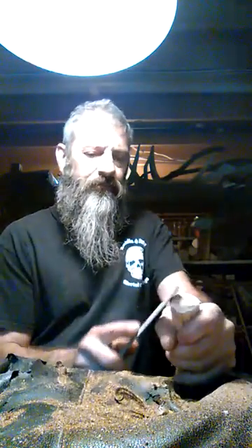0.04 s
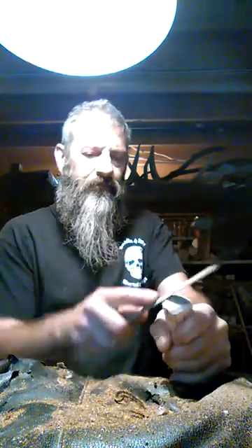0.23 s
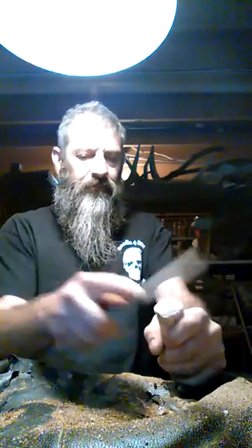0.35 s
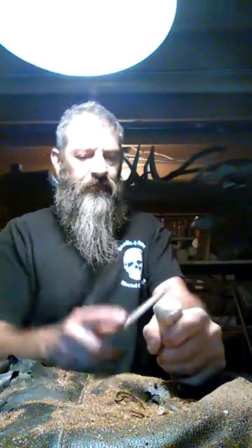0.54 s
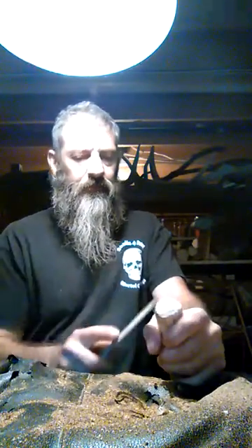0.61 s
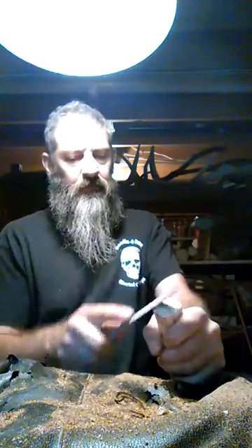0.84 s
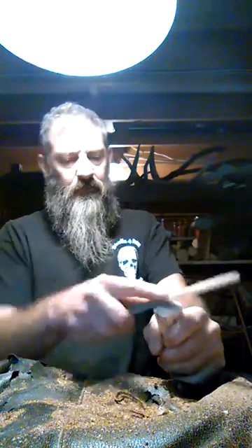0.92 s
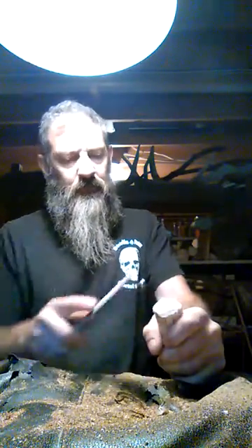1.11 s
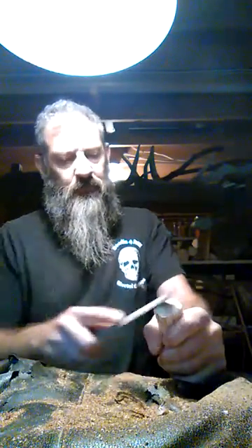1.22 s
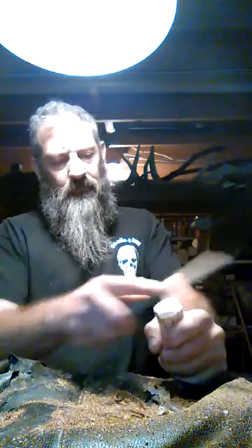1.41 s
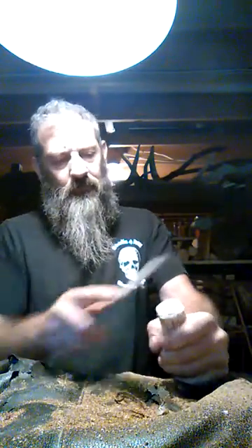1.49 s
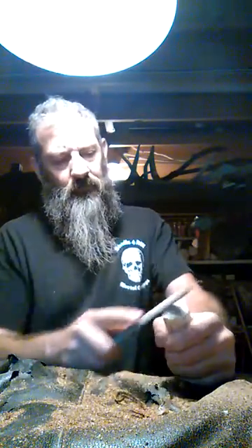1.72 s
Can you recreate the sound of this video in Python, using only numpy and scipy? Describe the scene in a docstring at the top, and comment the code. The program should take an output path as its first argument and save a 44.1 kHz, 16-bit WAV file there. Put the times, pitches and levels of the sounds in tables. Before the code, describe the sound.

Filing on wood in a small workshop: three scratchy strokes, each rising and falling in pitch. A booming bench bump and softer knocks follow the first, and the file taps down before the third. Two microphones catch faint room hiss.

```python
"""In a small workshop, a hand file makes three strokes across the end of a wooden stick, held in a fist
on a cloth-covered bench. The file lands with a knock; its teeth catch at a rate that follows its speed,
driving the stick's resonances and tearing off fibres. After the first stroke the hand bumps down hard
and the bench booms in its modes. Between strokes there is light brushing, and the moving arms make the
bench rumble. Two microphones hear it all with the room's reflections and steady noise."""
import sys
import numpy as np
from scipy import signal
from scipy.fft import rfft, irfft
from scipy.io import wavfile

SR = 44100
rng = np.random.default_rng(int(sys.argv[2]) if len(sys.argv) > 2 else 0)


def dump_mix(stems):
    """Bounce the given channels to the path in sys.argv[1] as a 16-bit WAV at rate SR."""
    frames = np.atleast_2d(stems).T  # one column per channel
    limited = np.clip(frames, -1, 1)  # hard clip at full scale
    pcm = np.round(limited * 32767).astype(np.int16)
    wavfile.write(sys.argv[1], SR, pcm)


N = 77175
TIME = np.arange(N) / SR


def filing():
    """Periodic forcing: each tooth kicks the stick and tears fibres, so pitch follows the file's speed."""
    # One table a stroke. Each row: time in seconds, teeth per second, relative chatter level in dB.
    strokes = [
        [(.14, 170, -46.5), (.196, 280, -34.5), (.208, 332, -35), (.226, 505, -16.5), (.243, 510, -26.5),
         (.268, 370, -29.5), (.305, 215, -39), (.335, 235, -30.5), (.36, 335, -22.5), (.382, 365, -28),
         (.401, 520, -13), (.413, 565, -25.5), (.432, 490, -41)],
        [(.835, 210, -49), (.895, 230, -41.5), (.925, 245, -35), (.942, 500, -30.5), (.98, 550, -49),
         (1.005, 679, -21.5), (1.04, 575, -37), (1.065, 448, -39), (1.095, 230, -62)],
        [(1.355, 260, -38), (1.395, 460, -43), (1.421, 610, -28), (1.429, 720, -25), (1.451, 760, -42),
         (1.47, 732, -35.5), (1.478, 590, -33.5), (1.497, 480, -36.5), (1.513, 240, -41), (1.53, 220, -43),
         (1.56, 190, -68.5)],
    ]
    # Pressure on the file, one table a stroke. Each row: time in seconds, relative rasp level in dB.
    pressures = [
        [(.125, -60), (.16, -42), (.215, -33), (.255, -31.5), (.305, -34), (.37, -34.5), (.414, -29.5),
         (.435, -41.5), (.485, -41.5), (.52, -51)],
        [(.83, -57), (.88, -40.5), (.915, -38.5), (.95, -29), (.985, -31), (1.048, -33), (1.08, -40),
         (1.12, -59)],
        [(1.347, -36.5), (1.385, -34.5), (1.41, -30.5), (1.46, -32.5), (1.492, -29.5), (1.52, -42),
         (1.56, -50.5)],
    ]
    # One row a stroke. Each row: contact cut-off in Hz, unevenness of the speed as a fraction.
    bites = [(450, .028), (1300, .022), (2600, .01)]
    # The sharp edge of a tooth's catch. Each row: frequency in Hz, relative spectral level in dB.
    edge_spectrum = [(500, -25), (1000, -5), (2100, 0), (3400, -1), (5000, -10), (9000, -25)]
    chatter_gain_db, shimmer_db, tooth_gating = -2.5, 3, 0.18
    squeak_hz, squeak_width_hz, squeak_db = 1490, 85, 3
    edge_reference_hz, edge_db = 662, -6
    kicks, bursts, squeak, edges = np.zeros((4, N))
    for stroke, pressure, (cut_hz, jitter) in zip(strokes, pressures, bites):
        rate, chatter_db = in_time(stroke)
        teeth = np.cumsum(rate * (1 + jitter * drift(80))) / SR
        catches = np.diff(np.floor(teeth), prepend=0) * SR / rate  # one impulse a tooth
        chatter = during(stroke) * from_db(chatter_gain_db + chatter_db + shimmer_db * drift(200))
        kicks += soften(catches, cut_hz) * chatter
        push = during(pressure) * from_db(in_time(pressure)[0])
        edges += push * rate / edge_reference_hz * coloured(catches * np.sqrt(rate), edge_spectrum)
        bursts += push * (1 + tooth_gating * np.cos(2 * np.pi * teeth))
        # The stick squeaks when twice the tooth rate meets a resonance.
        resonance = np.exp(-((2 * rate - squeak_hz) / squeak_width_hz) ** 2)
        squeak += push * resonance * np.sin(2 * np.pi * 2 * teeth)
    return stick(kicks) + bursts * rasp() + from_db(squeak_db) * squeak + from_db(edge_db) * edges


def stick(force):
    """Resonance: stick and file respond as parallel band-pass filters of alternating sign."""
    # Each row: frequency in Hz, bandwidth in Hz, peak gain in dB.
    resonances = [(209.7, 23.2, 10.5), (334.5, 40, 2), (530, 130, 1.5), (610.3, 71, -1), (670, 110, -11),
                  (1060, 490, -19), (1414, 66, -2.5), (2006, 27, -11.5), (2154, 440, -21.5),
                  (2840, 24, -20.5), (3014, 180, -8.5), (3434, 140, -2.5), (3747, 51, -17),
                  (5215, 450, -7.5)]
    out = 0
    for k, (hz, width_hz, db) in enumerate(resonances):
        r = np.exp(-np.pi * width_hz / SR)
        poles = [1, -2 * r * np.cos(2 * np.pi * hz / SR), r * r]
        out += (-1) ** k * from_db(db) * (1 - r * r) / 2 * signal.lfilter([1, 0, -1], poles, force)
    return out


def rasp():
    """Broadband excitation: tearing fibres are heard directly and also ring the stick."""
    # Each row: frequency in Hz, relative spectral level in dB.
    spectrum = [(100, -9), (250, -6.5), (650, 10), (1100, 0), (1700, -4.5), (2100, 6.5), (2400, 0.5),
                (2700, 5), (3500, 0), (4150, 4), (5200, 5.5), (6500, 3.5), (8500, 2.5), (11000, -0.5),
                (14000, -4)]
    tearing = from_db(-1) * coloured(spread(fibres), spectrum)
    ringing = from_db(-8.5) * rms_one(stick(fibres()))
    return tearing + ringing


def fibres(per_second=16000, spread_db=3):
    """Shot noise: fibres snap at random instants and with uneven size."""
    sizes = from_db(spread_db * np.minimum(rng.exponential(1, N), 4)) * rng.choice([-1, 1], N)
    return sizes * (rng.random(N) < per_second / SR)


def file_landings():
    """Impact excitation: the file lands and the held stick rings in damped modes."""
    # Each row: start in seconds, force level in dB, contact cut-off in Hz, crack level in dB.
    hits = [(.0103, -23, 2000, -34), (.0142, -22, 2500, -36), (.8312, -26, 650, -43),
            (1.3475, -13, 1000, -28), (1.3562, -23, 1500, -38)]
    # Each row: frequency in Hz, gain in dB, time to decay by 60 dB in seconds.
    modes = [(160, -9.5, 0.11), (217.4, -1, 0.083), (520, -6, 0.034), (608.6, -9, 0.16), (855, -19, 0.18),
             (1123, -19, 0.054), (1409, -8.5, .045), (1447, -14, 0.063), (2000, -14.5, 0.04),
             (3400, -20, .035)]
    return knocks(hits, modes)


def bench_bumps():
    """Free vibration: bumped by hand and stick, the bench booms in its low modes."""
    # Each row: start in seconds, force level in dB, contact cut-off in Hz, crack level in dB.
    hits = [(.228, -14, 77, -68), (.253, -10, 92, -74), (.272, -26, 106, -89), (.469, -4.5, 1110, -27.5),
            (.4745, -16, 1190, -18), (.487, -12.5, 456, -50), (.506, -11.5, 137, -74),
            (.572, -18, 250, -63), (.583, -14, 176, -66), (.6135, -24, 220, -43.5),
            (.7325, -22, 240.7, -44.5), (1.598, -27.5, 130, -54.5), (1.657, -35.5, 255, -63)]
    # Each row: frequency in Hz, gain in dB, time to decay by 60 dB in seconds.
    modes = [(59.1, -14.5, .55), (101.5, -23, 0.13), (130.2, -12, 0.1), (168, -8.5, 0.074),
             (230.6, -2, 0.077), (296, -2.5, .06), (401, -7, 0.068), (555, -4.5, 0.028), (689, -8.5, 0.033),
             (849, -9.5, 0.1), (940, -22, 0.12), (1090, -27, .06)]
    return knocks(hits, modes)


def knocks(hits, modes, crack_s=0.012):
    """Modal superposition: each contact starts a sum of decaying sines and a short crack of noise."""
    # Each row: frequency in Hz, relative spectral level in dB.
    crack_spectrum = [(200, 14.5), (700, 12.5), (1500, -9), (2800, -9), (7000, -11.5), (14000, -19.5)]
    force, crack, ring = np.zeros((3, N))
    for s, db, cut_hz, crack_db in hits:
        force += from_db(db) * soften(signal.unit_impulse(N, int(s * SR)), cut_hz, order=2)
        crack += from_db(crack_db) * (TIME >= s) * np.exp(-np.abs(TIME - s) / crack_s)
    for hz, db, t60 in modes:
        r, w = from_db(-60 / (t60 * SR)), 2 * np.pi * hz / SR
        ring -= from_db(db) * signal.lfilter([0, np.sin(w)], [1, -2 * r * np.cos(w), r * r], force)
    return ring + crack * coloured(spread(white), crack_spectrum)


def brushing(attack_s=0.024, release_s=0.12, flicker_db=2.5):
    """Sliding friction: the file rubs with a light, bright noise as it is drawn back."""
    # Each row: start in seconds, length in seconds, level before the fades in dB.
    rubs = [(0.509, .07, -46.5), (0.606, 0.015, -37.5), (1.178, 0.069, -56.5), (1.539, 0.22, -49),
            (1.663, 0.095, -53.5)]
    # Each row: frequency in Hz, relative spectral level in dB.
    spectrum = [(500, 8), (1200, -15.5), (3500, -1), (6000, -2), (8500, 2), (11000, -2.5), (14000, -9)]
    level = 0
    for s, length, db in rubs:
        rise = np.clip((TIME - s) / attack_s, 0, 1)
        fall = np.clip((s + length - TIME) / release_s + .5, 0, 1)
        level += from_db(db) * rise * fall
    return level * coloured(spread(white) * from_db(flicker_db * drift(250)), spectrum)


def handling():
    """Structure-borne sound: the moving arms shake the bench into a low rumble."""
    # Each row: time in seconds, level in dB.
    levels = [(0, -49), (.11, -47.5), (.2, -34), (.26, -27), (.31, -41.5), (.44, -34), (.64, -35.5),
              (.8, -45), (.95, -36), (1.04, -44.5), (1.11, -37.5), (1.2, -61), (1.32, -59), (1.4, -42),
              (1.66, -44.5), (1.75, -48.5)]
    # Each row: frequency in Hz, relative spectral level in dB.
    spectrum = [(25, -18), (55, 16.5), (78, -7), (110, 6), (160, 2), (230, 1), (330, -7), (550, -27.5),
                (1000, -43.5), (4000, -53)]
    return from_db(in_time(levels)[0]) * coloured(white(), spectrum)


def room_noise():
    """Stationary noise: the room has a faint, steady rumble and hiss."""
    # Each row: frequency in Hz, relative spectral level in dB.
    spectrum = [(25, 32), (60, 1), (200, -4), (500, -39), (1200, -11), (4000, -13), (9000, -3.5),
                (14000, -16)]
    return from_db(-54) * coloured(spread(white), spectrum)


def workshop(x, early_s=0.011, t60_s=0.32):
    """Reverberation: nearby reflections and a short tail, different on each side, join the direct sound."""
    # Each row of both: frequency in Hz, level relative to the direct sound in dB.
    early = [(60, -11.5), (250, -31.5), (600, -22), (1500, 4.5), (4000, -12.5), (9000, -1)]
    tail = [(60, -30), (250, -17), (800, -15.5), (1500, -11), (2500, -6.5), (9000, -6.5)]
    response = 1
    for share, decay in ((early, np.exp(-TIME / early_s)), (tail, from_db(-60 * TIME / t60_s))):
        reflections = rms_one(rng.standard_normal((2, N)) * decay) / np.sqrt(N)
        response += from_db(at_bins(share)) * rfft(reflections, 2 * N)
    return filtered(x, response)


def spread(draw):
    """Partial coherence: the two sides hear partly different grains of a wide source."""
    # Each row: frequency in Hz, correlation between the sides.
    coherence = [(200, 1), (700, 1), (1500, 1), (3000, 0.15), (6000, 0.55), (12000, .2)]
    alike = np.clip(at_bins(coherence), 0, 1)
    return filtered(draw(), np.sqrt(1 + alike)) + filtered(draw(), np.sqrt(1 - alike)) * [[1], [-1]]


def soften(x, hz, order=1):
    """Contact compliance: a soft contact acts as a low-pass filter."""
    return signal.sosfilt(signal.butter(order, min(hz, SR / 3), fs=SR, output="sos"), x + 1e-18)


def drift(hz):
    """Random fluctuation: low-passed noise of unit rms."""
    r = np.exp(-2 * np.pi * hz / SR)
    return rms_one(signal.lfilter([1], [1, -2 * r, r * r], rng.standard_normal(2 * N))[N:])


def white():
    """White noise."""
    return rng.standard_normal(N)


def from_db(db):
    """Decibels to amplitude ratio."""
    return 10 ** (np.asarray(db) / 20)


def rms_one(x):
    """Normalisation to unit rms."""
    return x / np.sqrt(np.mean(x ** 2) + 1e-20)


def in_time(rows):
    """Linear interpolation of a curve's columns at every sample."""
    s, *columns = np.transpose(rows)
    return [np.interp(TIME, s, c) for c in columns]


def during(rows, fade_s=0.0013):
    """A gate: one while a curve lasts, with short fades outside it."""
    return np.clip(np.minimum(TIME - rows[0][0], rows[-1][0] - TIME) / fade_s + 1, 0, 1)


def at_bins(points):
    """Interpolation over log frequency onto the padded transform grid."""
    hz, value = np.transpose(points)
    return np.interp(np.log(np.arange(N + 1) * SR / (2 * N) + 1), np.log(hz), value)


def filtered(x, response):
    """Convolution, as a product of spectra."""
    return irfft(rfft(x, 2 * N) * response)[..., :N]


def coloured(x, spectrum):
    """Spectral shaping, scaled to unit rms."""
    return rms_one(filtered(x, from_db(at_bins(spectrum))))


def scene():
    """Superposition: all sources add and sound through the room."""
    return workshop(filing() + file_landings() + bench_bumps() + brushing() + handling() + room_noise())


def record(dry):
    """Level and phase differences separate two microphones; peaks are rounded and the band is limited."""
    # Each row: frequency in Hz, left level minus right in dB.
    left_db = [(60, 3), (200, 2), (500, 7), (900, 6), (1500, 8), (2200, 3), (3500, 3), (5300, 8),
               (8000, -3), (10500, 0), (13000, 1)]
    # Each row: frequency in Hz, phase lead of the left side in radians.
    left_lead = [(60, .1), (220, .4), (520, 1.1), (950, 1.9), (1400, 0), (3500, .3), (5500, 1)]
    low_cut_hz, high_cut_hz = 66, 14200
    sides = np.array([[.5], [-.5]])
    pair = filtered(dry, from_db(sides * at_bins(left_db)) * np.exp(1j * sides * at_bins(left_lead)))
    pair = signal.sosfilt(signal.butter(4, low_cut_hz, "high", fs=SR, output="sos"), pair)
    return signal.sosfilt(signal.ellip(16, .1, 80, high_cut_hz, fs=SR, output="sos"), np.tanh(pair))


dry = scene()
out = record(dry)
dump_mix(out)
```